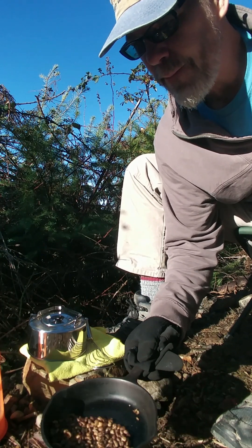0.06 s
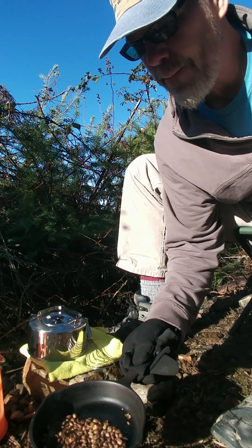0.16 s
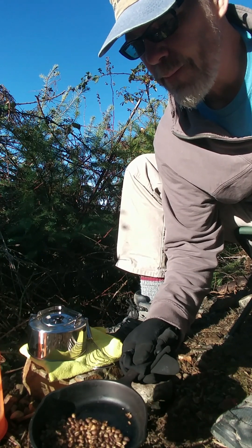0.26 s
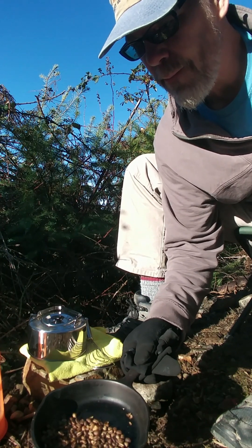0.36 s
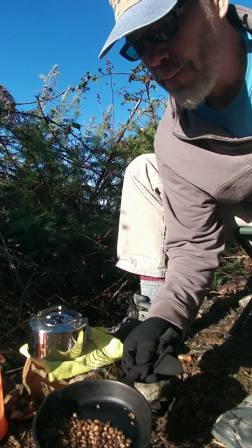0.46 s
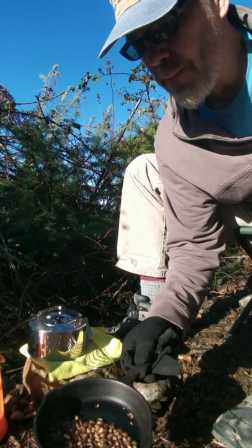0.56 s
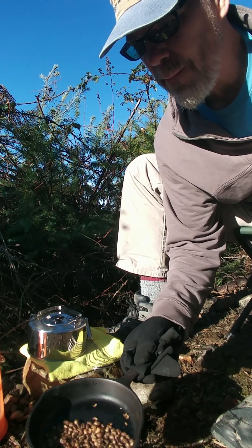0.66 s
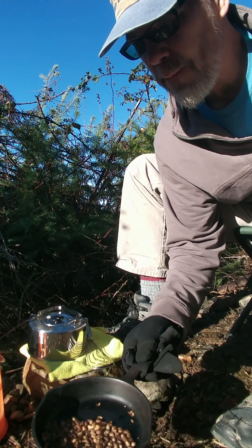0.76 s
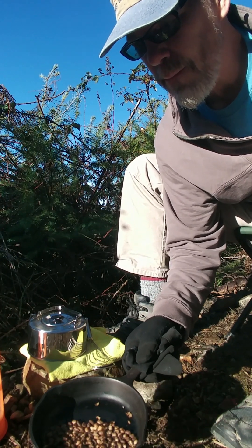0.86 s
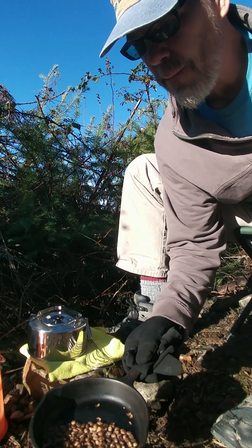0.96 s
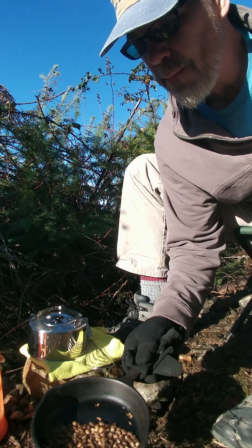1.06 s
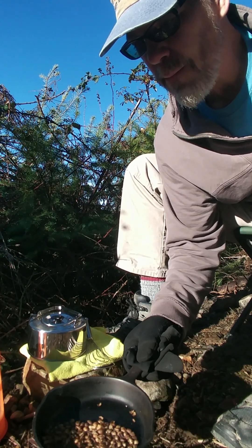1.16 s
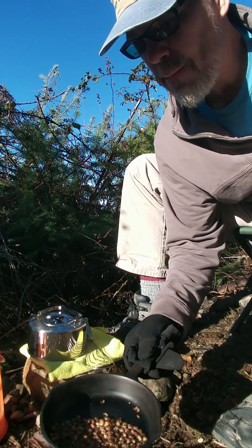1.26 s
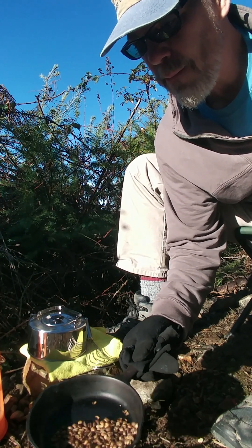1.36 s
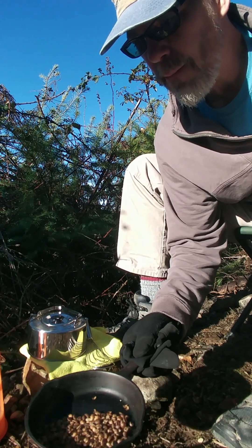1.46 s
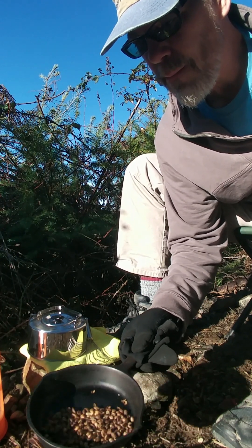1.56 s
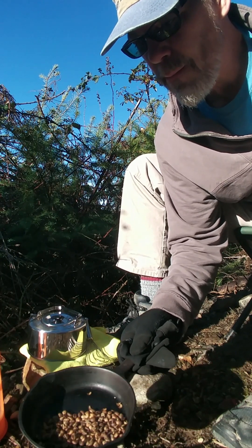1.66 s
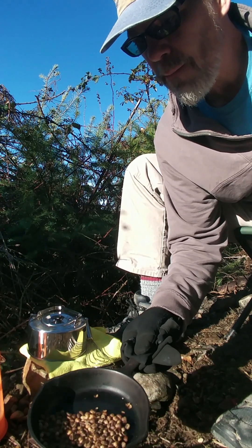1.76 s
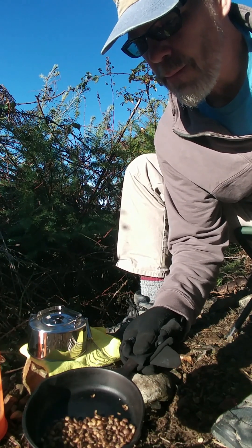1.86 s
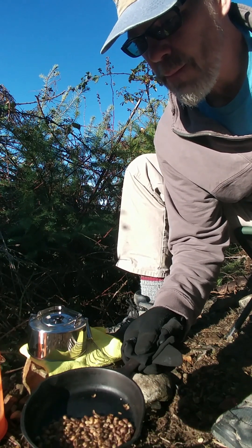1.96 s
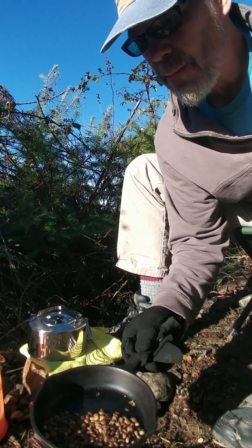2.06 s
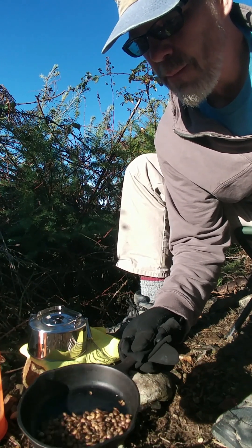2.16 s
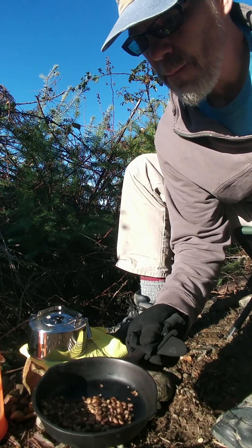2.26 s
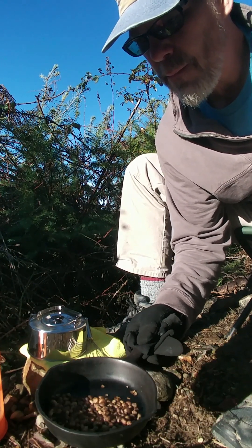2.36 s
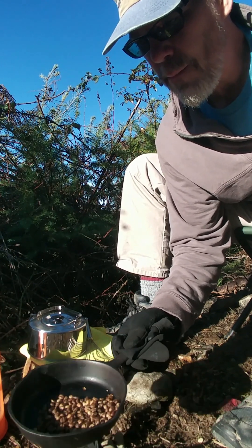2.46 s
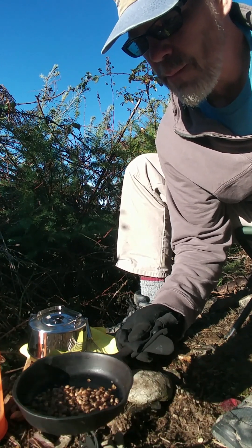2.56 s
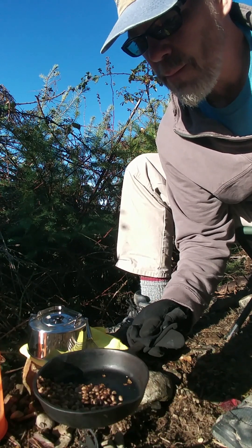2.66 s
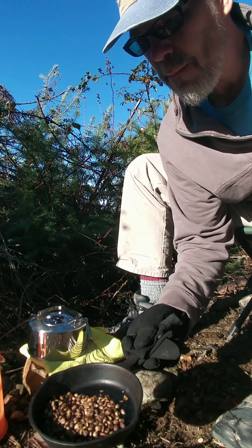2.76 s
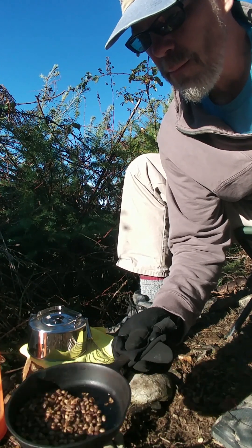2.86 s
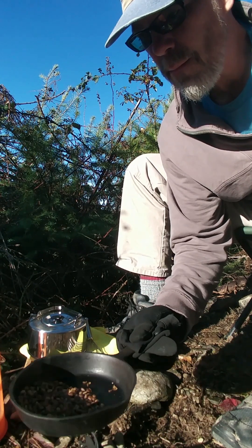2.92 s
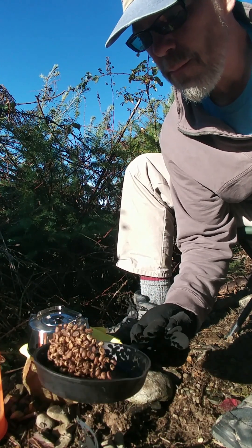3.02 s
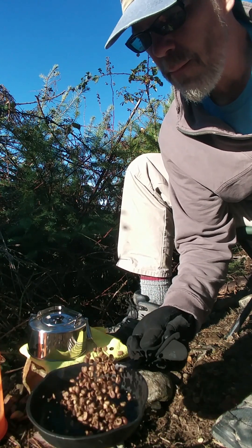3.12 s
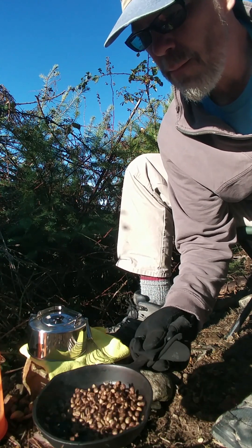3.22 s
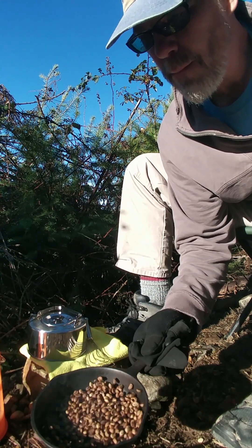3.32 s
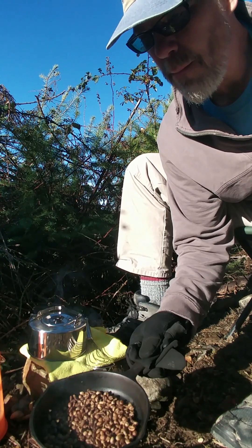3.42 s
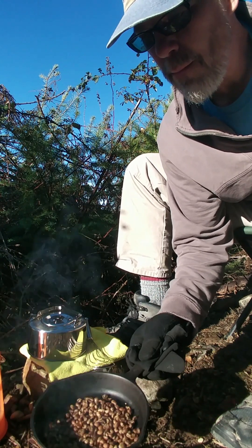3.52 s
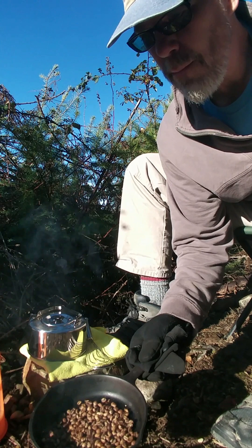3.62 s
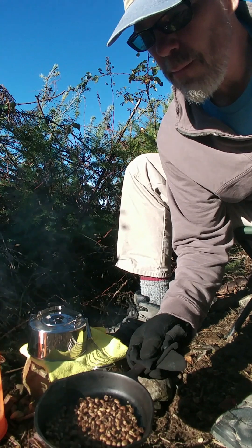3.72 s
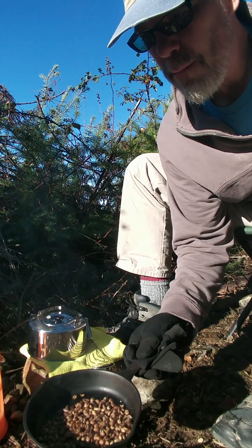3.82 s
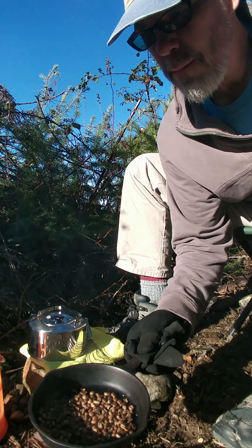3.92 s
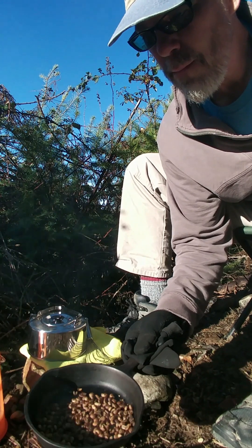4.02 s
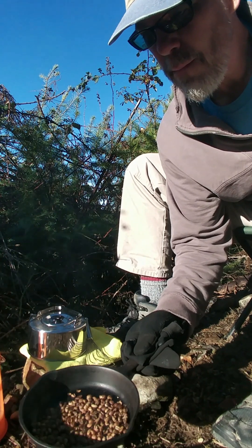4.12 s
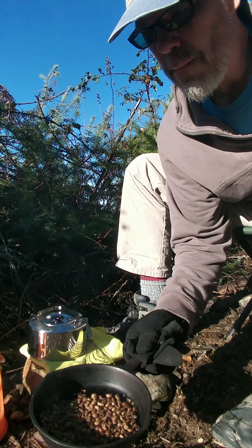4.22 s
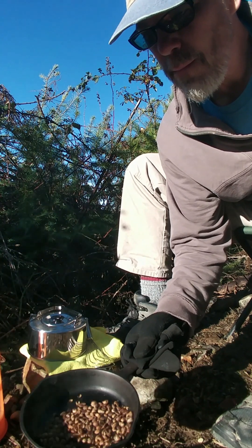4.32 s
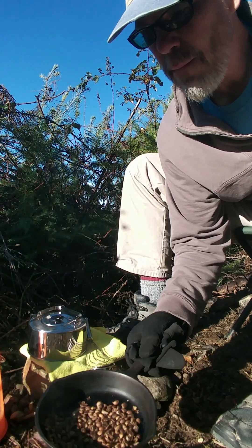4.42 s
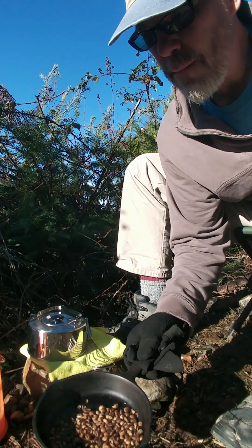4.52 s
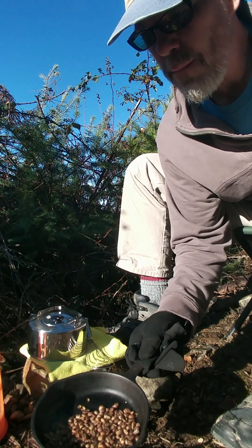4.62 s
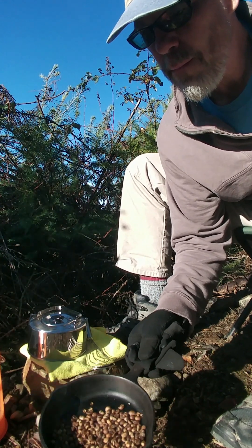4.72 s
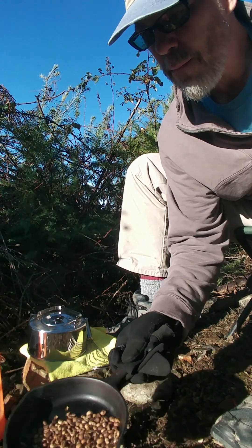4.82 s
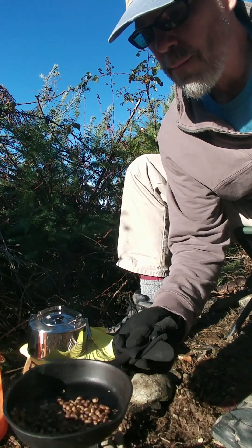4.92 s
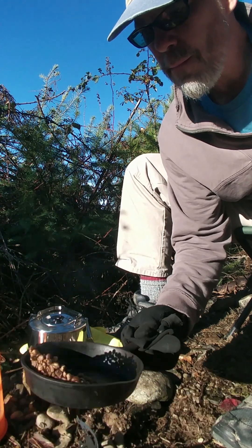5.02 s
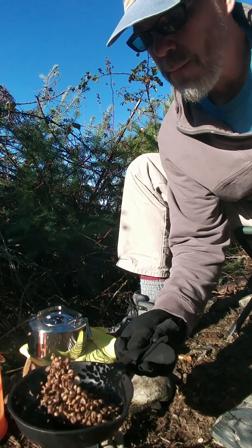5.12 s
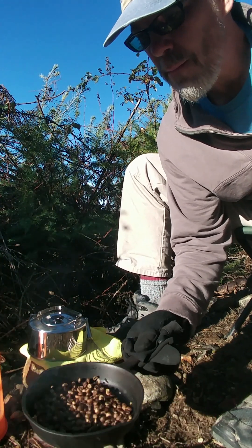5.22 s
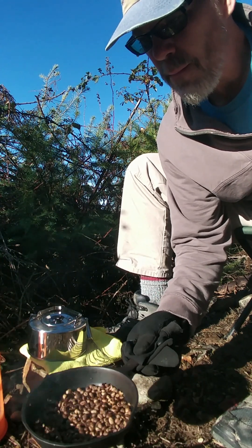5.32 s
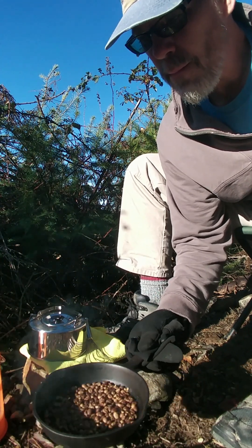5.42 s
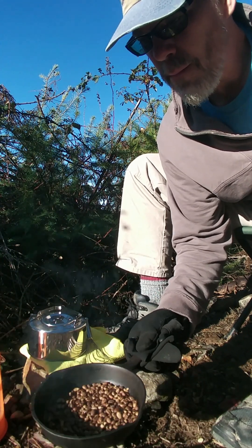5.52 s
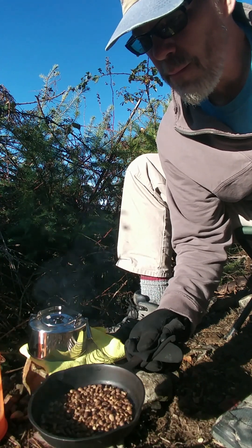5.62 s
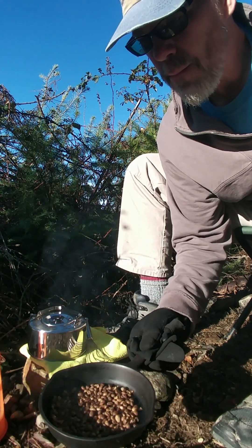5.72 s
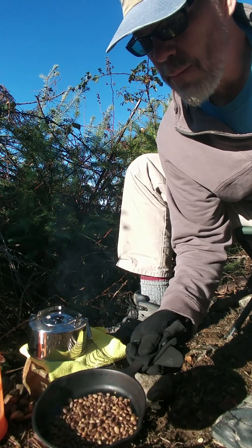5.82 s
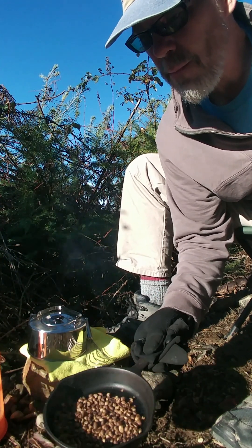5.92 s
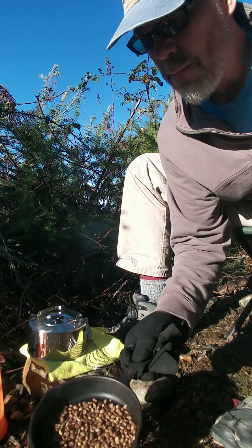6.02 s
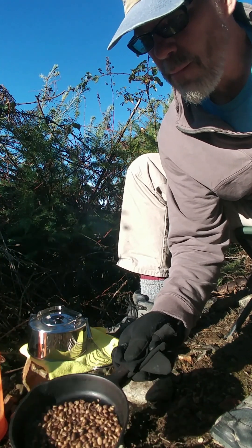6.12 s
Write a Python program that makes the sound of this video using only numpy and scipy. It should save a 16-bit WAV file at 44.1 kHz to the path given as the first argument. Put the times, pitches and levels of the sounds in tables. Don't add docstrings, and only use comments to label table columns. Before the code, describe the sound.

A steady, low, fluttering gas flame with thin hiss sits under everything, with far engines droning. Dry snaps of splitting beans stand out, each with a short splash of close echoes. Light metallic slides grow into a hard clattering toss midway, then a gentler second one. Near stereo microphone outdoors, the pan low and slightly to the right, no room reverberation.

```python
import sys
import numpy as np
from scipy import signal
from scipy.fft import rfft, irfft, next_fast_len
from scipy.io import wavfile
from scipy.ndimage import uniform_filter1d

SR = 44100
rng = np.random.default_rng(int(sys.argv[2]) if len(sys.argv) > 2 else 0)


def attenuation_scalar(level_db):
    decades = np.asarray(level_db, float) / 20
    return 10 ** decades


def unload_wav(signal):
    wavfile.write(
        sys.argv[1],
        SR,
        np.round(np.clip(np.atleast_2d(signal).T, -1, 1) * 32767).astype(np.int16),
    )


N = 272538


def curves(table):
    s, *columns = np.transpose(table)
    return [np.interp(np.arange(N) / SR, s, column) for column in columns]


def unit(x):
    return x / np.sqrt(np.mean(x ** 2))


def gain_at(spectrum, size):
    hz, db = np.transpose(spectrum)
    bins_hz = np.fft.rfftfreq(size, 1 / SR)
    return attenuation_scalar(np.interp(np.log(bins_hz + 1), np.log(hz), db))


def colour(x, spectrum):
    cepstrum = np.fft.irfft(np.log(gain_at(spectrum, size=4096)))
    cepstrum[1:2048] *= 2
    cepstrum[2049:] = 0
    response = np.fft.irfft(np.exp(np.fft.rfft(cepstrum)))
    response = unit(response) / 64
    return signal.fftconvolve(x, response[:2048])[:len(x)]


def high_pass(x, order, hz):
    return signal.sosfilt(signal.butter(order, hz, "high", fs=SR, output="sos"), x)


def ring(x, hz, t60):
    r = np.exp(-np.log(1000) / (t60 * SR))
    w = 2 * np.pi * hz / SR
    level = 2 * np.sqrt(1 - r) * np.sin(w)
    return level * signal.lfilter([0, 1], [1, -2 * r * np.cos(w), r * r], x)


def narrow(noise, hz, t60):
    return unit(ring(ring(noise, hz, t60), hz, t60))


def click(snap, hz, t60):
    y = ring(snap, hz, t60)
    return y / np.abs(y).max()


def walk(rate):
    hold = int(SR / rate)
    steps = np.repeat(rng.standard_normal(N // 100 + 1), hold)[:N]
    return 1.444 * uniform_filter1d(uniform_filter1d(steps, hold), hold)


def blend(alike):
    a, b = rng.standard_normal((2, N))
    alike = np.clip(alike, 0, 1)
    return a, alike * a + np.sqrt(1 - alike ** 2) * b


def ports(right, source, left=None):
    paths = {"flame": (0.32, 1), "pan": (0.327, 0.36), "crack": (0.229, 0.3), "drone": (0.12, 0.85)}
    # (f/Hz, level/dB)
    shade = [(60, 1.5), (250, -5), (450, 0), (1000, -5), (2000, -5), (4000, -6), (7000, -6), (11000, -9),
             (16000, -15)]
    lag_ms, share = paths[source]
    size = next_fast_len(N + 64)
    lag = np.exp(-2j * np.pi * np.fft.rfftfreq(size, 1 / SR) * lag_ms / 1000)
    spectrum = rfft(right if left is None else left, size)
    far = irfft(spectrum * lag * gain_at(shade, size) ** share, size)[:N]
    return np.array([far, right])


def pan():
    # (f/Hz, t60/s)
    modes = [(1149, .17), (2090, .12), (2158, .2), (3268, .2), (3315, .36), (4003, .24), (4876, .24),
             (4907, .2), (5477, .22), (5592, .18), (6480, .12), (6600, .12), (6759, .2), (7338, .13),
             (7450, .15), (8056, .2), (8370, .17), (8405, .22), (8745, .14), (8788, .15), (8837, .14),
             (9325, .15)]
    # (level/dB, left minus right/dB)
    mode_levels = [(-2.5, -3), (-23.5, 16.5), (1.5, 6), (-17, 18.5), (-3, 5), (-10, 0.5), (-9, 2.5),
                   (-23, 6.5), (-25, 3.5), (-14, -4), (-22.5, -3.1), (-28.5, 12), (-9.5, 2.5), (-16, 8),
                   (-21, 14), (-9, 1.5), (-17, 11.5), (-11.5, 2), (-7, 5.5), (-2.5, 3), (-7.5, -4.7),
                   (-16.5, 5.8)]
    mode_lags = [0, 9, 9, -3, -3, 0, 2, 2, 0, 3, 0, 1, 2, 3, 0, 0, 0, 0, 1, 1, 1, 0]
    # (f/Hz, level/dB per Hz)
    clatter = [(600, -50), (1150, -28), (1700, -44), (2150, -19), (2700, -30), (3300, -10), (4300, -16),
               (5600, -4), (6700, -8), (8700, -5), (9900, -20), (10700, -46), (11700, -44), (13500, -23),
               (15500, -32)]
    bean_load = 0.51
    shake_db, low_db, wall_db, high_db = shake()
    hits = taps(shake_db, 2.2, most=5000, least=260)
    right, left = np.zeros((2, N))
    for (hz, t60), (db, side_db), lag in zip(modes, mode_levels, mode_lags):
        if hz < 2500:
            tilt_db = low_db
        elif hz < 4500:
            tilt_db = 0
        else:
            tilt_db = wall_db if hz < 6200 else high_db
        if hz > 2500:
            t60 = t60 * bean_load
        level = attenuation_scalar(db + 6.5)
        near, far = (ring(hits * n * attenuation_scalar(tilt_db), hz, t60) * level for n in blend(1.02 - hz / 28000))
        flutter_db = 1.8 * walk(55)
        right += near * attenuation_scalar(flutter_db - side_db / 2)
        left += np.roll(far, lag) * attenuation_scalar(flutter_db + side_db / 2)
    knocks = taps(shake_db, 2.5, most=12000, least=1500) * attenuation_scalar(3 * walk(90))
    knocks *= attenuation_scalar(-2.5 + 0.17 * high_db + 0.41 * wall_db)
    near, far = (colour(knocks * n, clatter) for n in blend(0.099))
    spit = attenuation_scalar(10.5 + 0.3 * high_db)
    near, far = (x + spit * high_pass(x, 6, 11300) for x in (near, far))
    right, left = high_pass([right + near, left + far], 3, 950)
    return ports(right, "pan", left)


def shake():
    # (t/s, shake level/dB, length/s, wall modes level/dB)
    slides = [(0.04, -63, 0.057, 5.5), (1.31, -70, 0.036, 1), (1.5, -63, 0.089, 4),
              (1.714, -65.5, 0.049, -3), (2.103, -64.5, .04, -4), (2.25, -57.5, 0.035, 5),
              (2.401, -48, 0.026, 1), (2.46, -54.5, 0.16, 1), (2.78, -51, 0.027, 3),
              (2.862, -54, 0.028, -1), (3.435, -54.5, 0.05, -2), (3.5, -59, 0.088, -11),
              (3.875, -58.5, 0.029, -4.5), (4.02, -60.5, 0.016, -9), (4.266, -66, 0.18, 1),
              (4.514, -60, 0.037, -9), (4.724, -68, 0.056, 5), (4.86, -66, 0.063, -1.5),
              (5.634, -63, 0.19, -4), (5.818, -58.5, 0.037, -1), (6.148, -58, .04, -1)]
    # (t/s, shake level/dB, high modes level/dB, which grow with the height of the drop)
    tosses = [
        [(3.08, -72, -9), (3.118, -46.5, 3), (3.15, -24.5, -3), (3.18, -27.5, -4.5), (3.21, -29, 10.5),
         (3.24, -28.5, -0.5), (3.275, -44, 0), (3.34, -45, -8), (3.43, -61, -10)],
        [(5.08, -75, -5), (5.11, -52, 4), (5.145, -39.5, 0.5), (5.175, -27, -11), (5.2, -34.5, 0),
         (5.235, -43.5, -2), (5.31, -50, -17), (5.37, -51, -3), (5.43, -76.5, -22)],
    ]
    # (extra low modes/dB, extra wall modes/dB)
    landings = [
        (.4, 1),
        (4, 6.5),
    ]
    rest_db = -77
    rise_db_s, fall_db_s = 513, 271
    airborne_s, airborne_db = 0.063, -25
    t = np.arange(N) / SR
    power, wall = np.full(N, attenuation_scalar(2 * rest_db)), np.zeros(N)
    for s, db, length, wall_db in slides:
        near = slice(max(int((s - .15) * SR), 0), int((s + length + .3) * SR))
        since = t[near] - s
        rise_db = rise_db_s * np.minimum(since, 0)
        fall_db = fall_db_s * np.maximum(since - length, 0)
        slide = attenuation_scalar(2 * (db + rise_db - fall_db))
        power[near] += slide
        wall[near] += slide * wall_db
    low_db = -13 + 2.5 * walk(18)
    high_db = -11.5 + 2.5 * walk(5)
    out = np.array([10 * np.log10(power), low_db, wall / power, high_db])
    for toss, (more_low_db, more_wall_db) in zip(tosses, landings):
        start, end = toss[0][0], toss[-1][0]
        db, high_db = curves(toss)
        sweep = np.exp(-(np.maximum(t - start, 0) / 0.068) ** 4)
        settled = np.clip((t - start) / (end - start) * 2, 0, 1)
        low_db = 11 * sweep - 11.5 * settled + more_low_db
        wall_db = 11 * sweep - 3 * settled + more_wall_db
        out[0] += airborne_db * ((t > start - airborne_s) & (t < start))
        out = np.where((t >= start) & (t < end), [db, low_db, wall_db, high_db], out)
    return out


def taps(shake_db, spread_db, most, least):
    per_s = np.clip(most * attenuation_scalar(.65 * (shake_db + 32)), least, most)
    hit = rng.random(N) < per_s / SR
    size = unit(np.minimum(attenuation_scalar(spread_db * rng.exponential(size=N)), 5))
    return hit * size * np.sqrt(SR / per_s) * attenuation_scalar(shake_db)


def cracks():
    # (t/s, peak level/dB, hollow part level/dB, f/Hz, tail level/dB)
    splits = [(0.0499, -36, -3, 8750, -19), (0.6365, -11.5, -17, 8100, -29),
              (0.6562, -28.5, -4, 9200, -14.5), (0.733, -6, -1.5, 6940, -26),
              (1.476, -2.5, -10.5, 7900, -30), (1.6072, -17.5, -17, 7940, -20.5),
              (2.2595, -37.5, -20, 9500, -12), (3.0928, -36, -10, 8900, -6), (4.1532, -5, -4.5, 8440, -19),
              (5.5818, -24.5, -9, 9400, -24)]
    # (second snap after/ms, hollow ring f/Hz, knock on the pan level/dB, spray tilt/dB per octave)
    details = [(.4, 3400, -31, -14), (1, 4600, -46, 2), (0.23, 5600, -40, 5), (.46, 5200, -16, -6.5),
               (.86, 6700, -60, 1.5), (.5, 4100, -38, 5), (.4, 4800, -26, 6), (0.29, 6800, -2, -6),
               (.24, 4700, -47, 1), (.4, 4700, -8, 5)]
    # (f/Hz, level/dB per Hz)
    spray_points = [(1290, -20), (2200, -20.5), (2750, -26), (3300, -2.5), (4420, -20), (5960, -3.5),
                    (7710, -10.5), (8580, -1.5), (10600, -12), (14700, -15), (16000, -42)]
    out = np.zeros((2, N + 8192))
    t = np.arange(8192) / SR
    noises = rng.standard_normal((len(splits), 2, 8192))
    for split, detail, noise in zip(splits, details, noises):
        s, db, hollow_db, hz, tail_db = split
        gap_ms, hollow_hz, knock_db, tilt_db = detail
        snap = np.zeros(8192)
        snap[0] = 1
        snap[int(gap_ms * SR / 1000)] = .9
        body = click(snap, hz, .0018) + attenuation_scalar(hollow_db + 2) * click(snap, hollow_hz, .0022)
        body = high_pass(body, 3, 2900)
        body = signal.lfilter(*signal.iirnotch(10700, 5, SR), body)
        body += attenuation_scalar(knock_db) * click(snap, 1150, 0.013)
        fall = attenuation_scalar(-15) * attenuation_scalar(-60 * t / .014) * np.minimum(t / .0008, 1)
        fall += attenuation_scalar(tail_db) * attenuation_scalar(-60 * t / 0.11) * np.minimum(t / 0.00035, 1)
        spray = [(f, g + tilt_db * np.log2(f / 5000)) for f, g in spray_points]
        i = int((s + .001) * SR)
        for port, n, port_db in zip(out, noise, (3.5, 4.5)):
            port[i:i + 8192] += attenuation_scalar(db + port_db) * (body + colour(fall * n, spray))
    band = signal.butter(3, [650, 15800], "band", fs=SR, output="sos")
    thin = signal.sosfilt(band, out[:, :N])
    right, left = signal.lfilter(*signal.iirnotch(10800, 9, SR), thin)
    return ports(right, "crack", left)


def flame():
    # (t/s, lift 0-1)
    heights = [(0, 0.05), (.6, 0.09), (1.2, 0.1), (1.33, 0.34), (2.0, 0.38), (2.5, 0.88), (2.75, 0.68),
               (3.25, 0.5), (3.54, 0.24), (3.61, 0.48), (3.72, 0.38), (4.5, 0.34), (4.6, 0), (4.84, 0.14),
               (4.93, 0.4), (5.3, 0.61), (5.75, .45), (6.18, 0.37)]
    # (t/s, whole roar/dB, extra below 300 Hz/dB)
    flaps = [(1.45, 2.2, 1), (2.42, 2, 5), (4.45, 2.3, 1.5), (4.75, -0.4, -1), (5.3, -2.5, -6),
             (5.75, 4, -0.5), (6.18, -1.5, -1.5)]
    # (f/Hz, level/dB per Hz)
    roar_points = [(59, -20.5), (100, -5), (119, -10.5), (178, -12), (261, -14.5), (311, -10), (423, -9),
                   (490, -11), (635, -26), (692, -18), (812, -11.5), (965, -20), (1080, -13), (1430, -25),
                   (1900, -43), (2470, -63), (4180, -120)]
    # (f/Hz, level/dB per Hz)
    hiss_points = [(880, -46), (1500, -6.5), (2620, -11.5), (3250, -7.5), (4040, -11.5), (4410, -9),
                   (4810, -11.5), (5210, -11), (6850, -4.5), (8010, -3.5), (8750, -3), (11100, -14.5),
                   (12700, -7.5), (15600, -13)]
    lift, = curves(heights)
    t = np.arange(N) / SR
    roar_db = -43.5 + 0.2 * lift
    hiss_db = -68 + 7.5 * lift + 14
    upper_db = -50 - 26 * lift - 5
    lower_db = -79 + 23.5 * lift + 8.5
    rim_db = -86.5 + 45 * lift + 1.3 * walk(4.5)
    flap_s = 0.05
    flap_db, boom_db = sum(np.outer(db, np.exp(-((t - s) / flap_s) ** 2)) for s, *db in flaps)
    roar_level = attenuation_scalar(roar_db + flap_db + 1.14 * walk(9))
    roar = [roar_level * colour(n, roar_points) for n in blend(0.98)]
    lows = signal.butter(2, 300, fs=SR, output="sos")
    roar = [r + (attenuation_scalar(boom_db) - 1) * signal.sosfiltfilt(lows, r) for r in roar]
    hiss = [attenuation_scalar(hiss_db) * colour(n, hiss_points) for n in blend(0.24)]
    upper = [attenuation_scalar(upper_db) * narrow(n, 6770, 0.0037) for n in blend(0.23)]
    lower = [attenuation_scalar(lower_db) * narrow(n, 3800, 0.013) for n in blend(0.89)]
    rim = [attenuation_scalar(rim_db) * narrow(n, 9100, 0.0016) for n in blend(.2)]
    right, left = np.sum([roar, hiss, upper, lower, rim], axis=0)
    return ports(right, "flame", left)


def edge():
    swell = attenuation_scalar(-74.5 + 3.5 * walk(3))
    return swell * np.array([narrow(n, 15600, .004) for n in blend(.3)])


def drone():
    # (t/s, level/dB, waver/dB)
    engine = [(0, -54.5, -3.5), (1.2, -50, 4), (2.2, -56, 1.5), (2.8, -50, 6.6), (4.5, -43, 0.6),
              (5.6, -49.5, -3), (6.18, -51.5, 11)]
    # (t/s, f/Hz, level/dB)
    second_engine = [(0, 63, -49), (.4, 62.8, -57), (1.3, 64.4, -69), (1.75, 64, -60), (2.5, 60.4, -51),
                     (3.0, 58, -48), (3.4, 51, -55.5), (3.8, 51.4, -45.5), (4.54, 59.5, -42.5),
                     (5.05, 63, -54.5), (5.35, 63.3, -54), (5.6, 67.3, -54), (6.1, 71.6, -39.5)]
    db, waver_db = curves(engine)
    under_hz, under_db = curves(second_engine)
    tone_hz = 90.6 + 0.4 * walk(6.26)
    tone_db = db + 1.5 + 0.6 * walk(12) + waver_db * walk(7)
    tone = attenuation_scalar(tone_db) * np.sin(2 * np.pi * np.cumsum(tone_hz) / SR)
    under_hz = under_hz + 2.44 * walk(11.0)
    under_db = under_db - 3.5 + 2.6 * walk(10)
    under = attenuation_scalar(under_db) * np.sin(2 * np.pi * np.cumsum(under_hz) / SR)
    rumble = attenuation_scalar(-55.5) * narrow(rng.standard_normal(N), 63, 0.09)
    return ports(tone + under + rumble, "drone")


def scene():
    steady = pan() + flame() + edge() + drone()
    steady = signal.sosfilt(signal.ellip(10, .2, 60, 15780, fs=SR, output="sos"), steady)
    return high_pass(steady, 4, 42) + cracks()


def low_pass(x):
    return signal.sosfilt(signal.butter(12, 17080, fs=SR, output="sos"), x)


def record(dry):
    rounded = np.tanh(.5 * dry) / .5
    rounded = signal.sosfilt(signal.ellip(8, .3, 70, 16500, fs=SR, output="sos"), rounded)
    return low_pass(rounded)


dry = scene()
out = record(dry)
unload_wav(out)
```